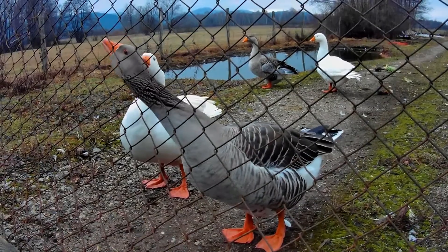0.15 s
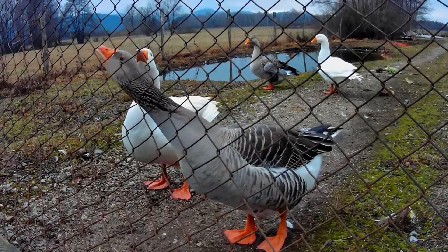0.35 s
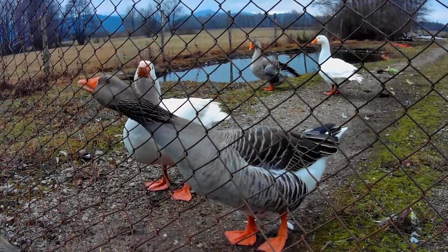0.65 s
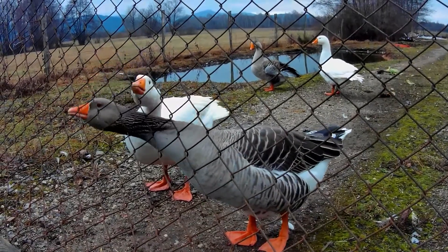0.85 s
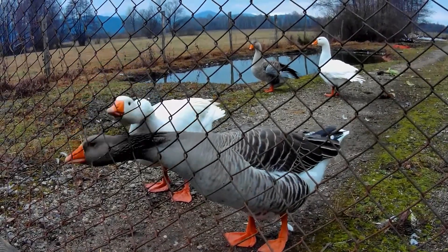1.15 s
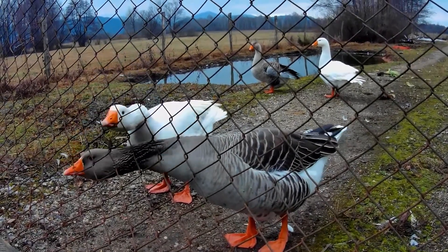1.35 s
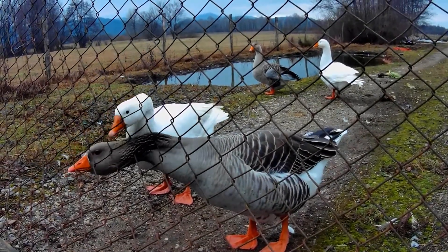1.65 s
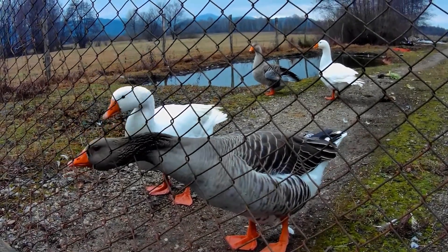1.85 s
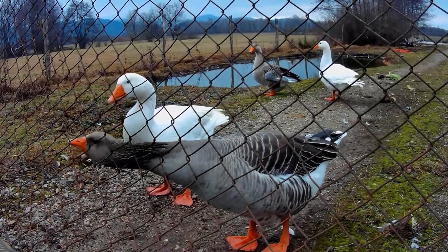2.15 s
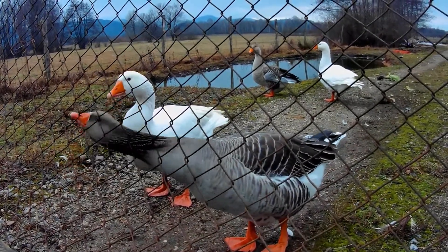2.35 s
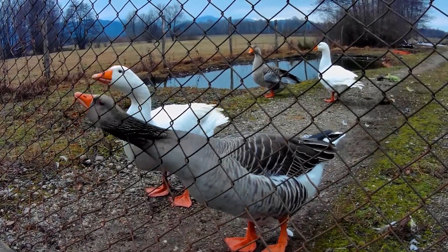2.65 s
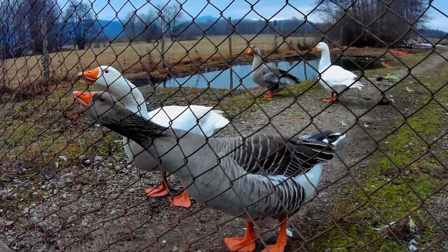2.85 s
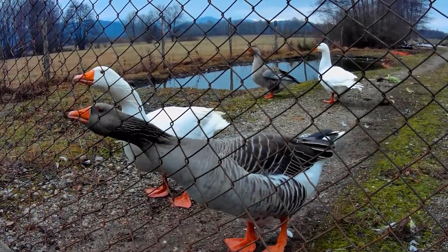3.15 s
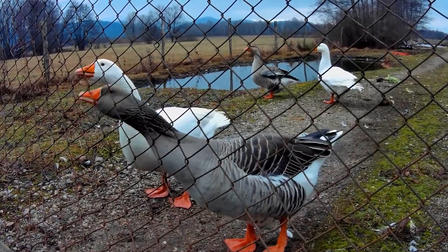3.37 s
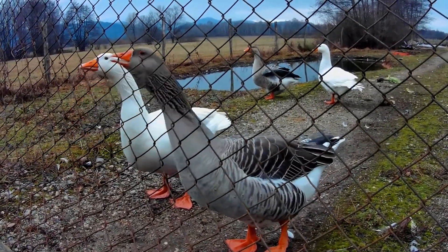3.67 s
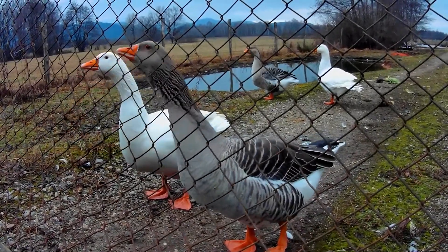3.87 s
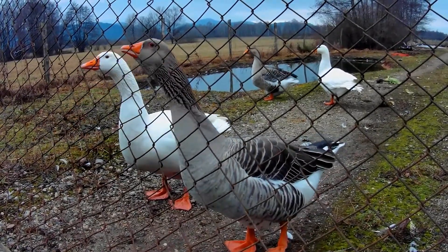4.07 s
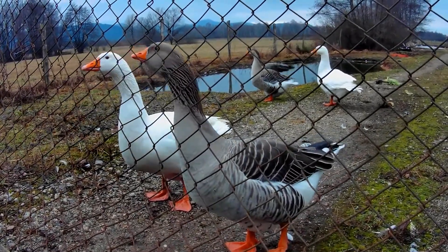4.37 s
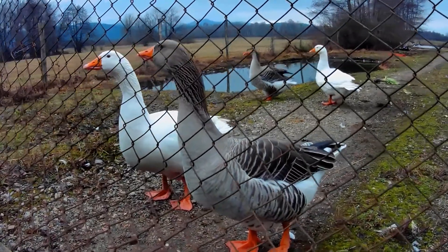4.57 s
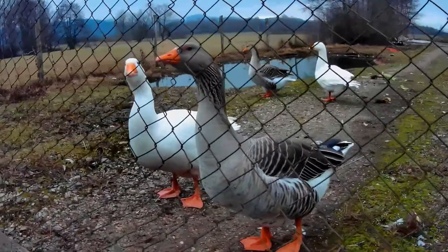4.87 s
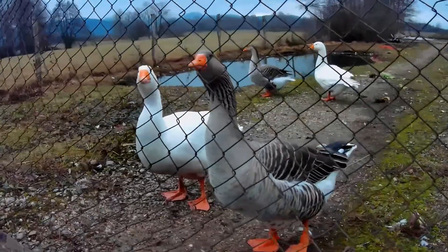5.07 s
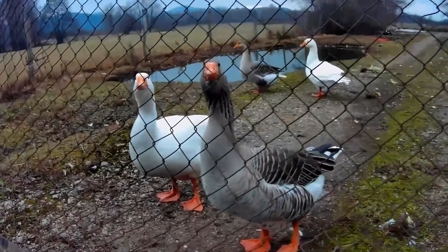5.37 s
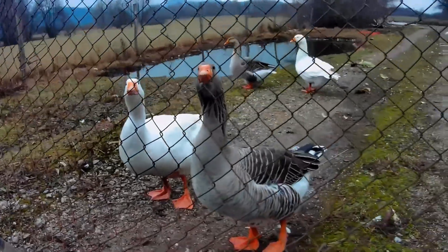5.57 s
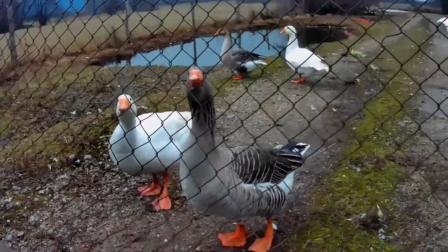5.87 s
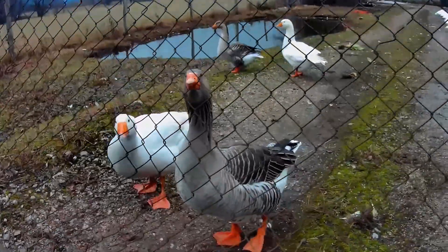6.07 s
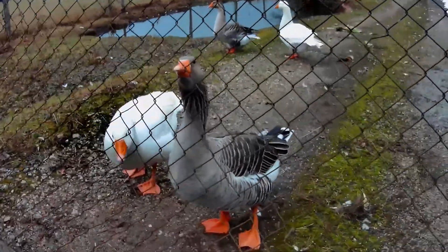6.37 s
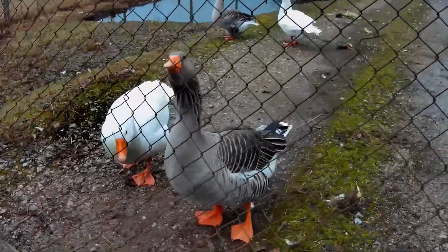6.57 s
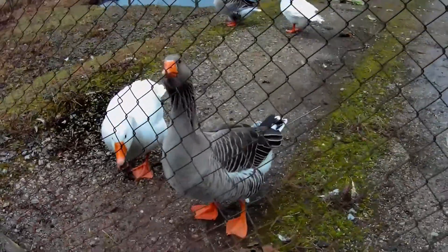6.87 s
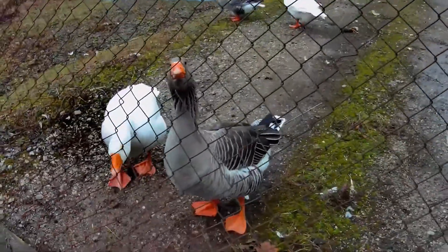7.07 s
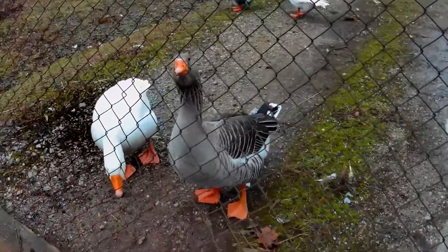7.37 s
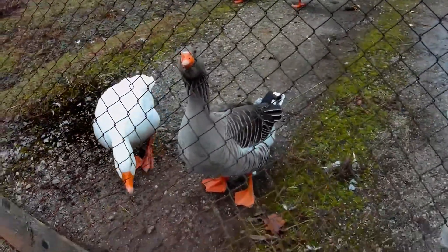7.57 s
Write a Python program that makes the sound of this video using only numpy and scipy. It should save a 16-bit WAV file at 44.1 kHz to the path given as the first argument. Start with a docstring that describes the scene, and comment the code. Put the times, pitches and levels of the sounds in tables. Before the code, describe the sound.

A goose cackles close by in two rough pulsing bouts, gives two loud honks, then settles to soft grunts, gravel ticks and light wind.

```python
"""A domestic goose cackles in two bouts and breaks into two loud honks, at a wire fence by a pond, close by.
Its calls are syrinx pulses ringing a windpipe filter, rebalanced in bands, with short yelps and thin peeps.
A second goose grunts along in low, loose pulses and goes on softly; another answers from far off.
Feet tick on gravel as noise knocks and grains; filtered noise makes light wind and faint open air.
The microphone hears the yard's scatter and a faint tail; a noise gate lets hiss in with the sound."""
import sys
import numpy as np
from scipy import signal
from scipy.fft import rfft
from scipy.io import wavfile
from scipy.ndimage import uniform_filter1d, map_coordinates

SR = 44100
rng = np.random.default_rng(int(sys.argv[2]) if len(sys.argv) > 2 else 0)


def dump_mix(stems):
    """Bounce the given channels to the path in sys.argv[1] as a 16-bit WAV at rate SR."""
    frames = np.atleast_2d(stems).T  # one column per channel
    limited = np.clip(frames, -1, 1)  # hard clip at full scale
    pcm = np.round(limited * 32767).astype(np.int16)
    wavfile.write(sys.argv[1], SR, pcm)


N = 340452
TIME = np.arange(N) / SR  # [s]

# All source levels hold before the yard adds its reflections.
# Syllables of the cackling goose: (start [s], end [s], top pitch [Hz], throat body at the crest [dB],
# nasal ring at the crest [dB], roughness at the crest [0-1], bill opening [factor on the resonances])
CACKLES = [(.123, .235, 157.2, -33.5, -26, 0.33, 0.97), (.228, 0.314, 153, -31.5, -27.5, 0.25, 1),
           (.328, 0.445, 153.4, -34.5, -25.5, 0.2, 0.99), (.405, 0.54, 158.2, -30.5, -22.5, 0.16, 0.99),
           (.525, 0.633, 156.2, -30.5, -24, 0.07, 1), (.615, 0.729, 164.3, -30, -21, 0.2, 0.98),
           (.71, 0.825, 166.9, -28.5, -20.5, .1, 1.007), (.805, 0.923, 170, -29, -22.5, 0.13, 1.025),
           (.915, 1.051, 170.2, -29, -24.5, 0.26, 1.046), (1.082, 1.119, 183.6, -30, -42, 0.56, 1.1),
           (1.105, 1.182, 176.4, -29.5, -25, 0.33, 1.003), (2.467, 2.554, 163.4, -34.5, -37, 0.7, 1.04),
           (2.535, 2.609, 167.3, -34.5, -40.5, 0.54, 0.94), (2.657, 2.762, 165.6, -30, -24.5, 0.27, 1.01),
           (2.745, 2.861, 161.1, -30.5, -27, 0.28, 1.007), (2.852, 2.966, 164, -29, -22.5, .18, 1.01),
           (2.955, 3.105, 163.4, -32, -23, .28, .98), (3.07, 3.173, 165.6, -33.5, -28, .1, 1.033),
           (3.177, 3.252, 183.7, -32.5, -24.5, 0.36, 0.92), (3.225, 3.306, 188.8, -31, -26, 0.31, 0.96),
           (3.326, 3.425, 173, -25, -23.5, 0.42, 1.09), (3.42, 3.499, 183.7, -30.5, -28.5, .35, 0.91),
           (3.465, 3.559, 168.4, -31, -26.5, 0.33, 1.086)]
# Loud honks: (start [s], end [s], pitch before the push [Hz], held level [dB], second push [dB])
HONKS = [(3.643, 3.859, 180.1, -17, 7), (3.894, 4.035, 176.2, -18, -0.5)]
# Parts of a honk, in rows chest, body, nasal ring, rasp:
# (over the held level [dB], share of the push [1], added at the start [dB], added at the end [dB])
HONK_PARTS = [(-21, 0.17, -16, -13.5), (-8, .17, -22.5, -11.5), (0, 0.98, -34.5, -28.5),
              (-12, 0.98, -22, -23.5)]
# Short hoarse yelps: (start [s], end [s], first pitch [Hz], throat body [dB], nasal ring [dB], rasp [dB])
YELPS = [(1.294, 1.351, 180.8, -27, -18, -31), (2.177, 2.247, 170.1, -29.5, -31.5, -46.5),
         (3.869, 3.92, 186.5, -20, -29.5, -28.5), (4.162, 4.213, 177.8, -26.5, -28.5, -43)]
# Thin whistled peeps, alone or as a syllable breaks out:
# (start [s], end [s], first pitch [Hz], last pitch [Hz], level at the crest [dB], octave re first harmonic [dB])
PEEPS = [(0.052, 0.088, 982, 935, -54, 1), (0.114, 0.149, 1107, 1120, -46, 3),
         (1.101, 1.17, 1190, 1275, -33, 14), (2.17, 2.229, 1040, 950, -35, -4.5),
         (2.379, 2.448, 723, 530, -47, -36), (2.458, 2.52, 1094, 1160, -42, 6),
         (2.655, 2.676, 1082, 1110, -40.5, 4)]
# Throat resonances of the cackle and yelp: (frequency [Hz], level [dB])
CACKLE_THROAT = [(200, -33), (330, -29.5), (400, -23), (480, -5.5), (630, -8.5), (790, -0.5), (950, -18),
                 (1120, 3.5), (1230, 3.5), (1430, -27.5), (1700, -14.5), (1830, -17.5), (1980, -7.5),
                 (2180, -15), (2380, -14), (2750, -25.5), (3500, -26.5), (4500, -41.5), (7000, -59),
                 (10000, -73)]
# Throat resonances of the honk: (frequency [Hz], level [dB])
HONK_THROAT = [(200, -33), (370, -37.5), (550, -10.5), (740, -13.5), (920, -26.5), (1100, -3.5),
               (1280, -17.5), (1470, -51.5), (1660, -22), (2000, -34.5), (2380, -12), (2600, -28.5),
               (2880, -22.5), (3200, -43.5), (3650, -42.5), (4050, -38.5), (4700, -53.5), (5250, -48.5),
               (5700, -57.5), (6350, -53.5), (7300, -74), (10000, -80)]
# Bands of throat body, nasal ring and rasp: (low edge [Hz], high edge [Hz])
CALL_BANDS = [(260, 930), (930, 1430), (1430, 12000)]
# Grunts of the second goose:
# (start [s], length [s], level [dB], pitch before its arch [Hz], nasal ring [dB], low edge [Hz])
GRUNTS = [(.048, 0.069, -51.5, 135.6, 10, 102), (0.257, 0.065, -31.5, 141.7, -14, 370),
          (0.483, 0.08, -29, 143.5, 10.5, 366), (0.579, 0.057, -34, 140.7, 0, 400),
          (.67, 0.18, -33, 141, 0, 370), (0.941, 0.096, -28.5, 138, 0, 368), (1.18, .096, -37, 130, 7, 110),
          (1.391, .12, -42, 125.3, 3, 100), (1.62, 0.099, -46, 125.3, 1, 101),
          (2.54, 0.048, -31.5, 134.4, 13, 410), (2.756, 0.13, -33, 141.1, 6.5, 422),
          (2.967, .17, -31, 139.8, -10, 394), (3.224, 0.092, -27, 157.4, 16, 465),
          (3.457, 0.1, -27.5, 142.3, 6.5, 413), (5.879, 0.099, -49.5, 122.4, 6.5, 316),
          (6.149, 0.09, -52.5, 120.6, 17, 398), (6.384, .1, -56, 111.8, 13.5, 337.5),
          (6.632, 0.096, -57, 116, 7, 303), (6.931, 0.1, -47.5, 117.9, 10, 100),
          (7.191, .13, -52, 122.8, 7.5, 99.5), (7.457, 0.15, -51.5, 125.5, 10, 100.6),
          (7.7, 0.066, -61.5, 117, -4.5, 100)]
# Throat resonances of the grunt: (frequency [Hz], level [dB])
GRUNT_THROAT = [(70, -30.5), (130, -1), (260, -4.5), (380, -15), (520, -1.5), (680, 0.5), (880, -8.5),
                (1100, -11), (1600, -17), (2100, -16), (2700, -31), (5000, -41.5), (9000, -65.5)]
# Louder grunts reach higher: (level [dB], top edge [Hz])
GRUNT_TOP = [(-53, 1100), (-51, 2030), (-39.5, 3700)]
# Answers of the far goose: (start [s], end [s], top pitch [Hz], nasal ring at the crest [dB])
FAR_CALLS = [(4.448, 4.646, 186.3, -57.5), (4.69, 4.805, 179, -67), (5.112, 5.198, 179, -69),
             (5.277, 5.463, 186.4, -67.5)]
# Feet on gravel: (time [s], level of the first 10 ms [dB], centre frequency [Hz], 60 dB decay time [s])
TICKS = [(2.002, -68.5, 3200, 0.019), (4.74, -55, 848, 0.057), (4.94, -54, 1220, .035),
         (5.387, -46.5, 536, 0.053), (5.387, -49, 259, 0.11), (5.389, -62, 1300, 0.049),
         (5.691, -73.5, 2970, 0.063), (5.764, -64.5, 2200, .06), (5.932, -55.5, 2000, .04),
         (6.062, -73, 1960, .037), (7.065, -51.5, 700, 0.13), (7.113, -57.5, 534, .091)]
# Gravel shifting under a step: (time of the peak [s], level [dB], rise [dB/s], fade [dB/s])
SCUFFS = [(5.8, -66.5, 130, 110), (5.949, -64.5, 150, 91), (6.96, -65.5, 600, 71)]
# Spectrum of shifting gravel: (frequency [Hz], level [dB])
SCUFF_COLOUR = [(600, -54), (1500, -7), (2100, 5), (3000, -20), (4200, -19), (5500, -15), (8000, -28),
                (14000, -35)]
# Decay of the yard's tail: (frequency [Hz], 60 dB decay time [s])
YARD = [(150, 0.55), (600, 0.48), (1100, 0.24), (2500, 0.45), (6000, 0.95)]
# Wind gusts: (time of the peak [s], half width at 1/e [s], rise over the steady wind [dB])
GUSTS = [(5.7, 0.23, 11), (6.15, 0.32, 12.5), (6.85, 0.057, 4), (7.5, 0.068, 8)]
# Spectrum of the wind rumble: (frequency [Hz], level [dB])
WIND_COLOUR = [(8, -2.5), (20, 7), (40, -3), (80, -5.5), (130, -21), (250, -36.5), (600, -64)]
# Spectrum of the open air: (frequency [Hz], level [dB])
AIR_COLOUR = [(60, -1), (150, -5.5), (300, -9.5), (600, -11), (1100, -7.5), (1600, -19.5), (3000, -31),
              (7000, -41), (12000, -31.5), (15000, -40.5)]
# Spectrum of the gated hiss: (frequency [Hz], level [dB])
HISS_COLOUR = [(2000, -7.5), (7000, -28), (8200, -13), (9300, -2.5), (10800, -9.5), (12000, -21.5),
               (14000, -34)]

CREST = .42  # share of a syllable or yelp that passes before its effort peaks
SCOOP, DROOP = .02, 0.077  # shares by which the pitch is lower at a syllable's start and end
BILL_OPENS, BILL_SHUTS = 0.018, 0.076  # falls of the resonance factor at a syllable's start and end
# The rasp of a middling syllable, which grows as the goose presses higher and rings louder
USUAL_HZ, USUAL_RING_DB = 165, -25
RASP_DB, RASP_DB_PER_HZ, RASP_FOLLOWS_RING = -35.5, 0.4138, 0.76
HONK_ATTACK_S, HONK_RELEASE_SHARE = 0.021, 0.2
BURST_DB, BURST_S = 8.5, .036  # opening push of a honk, and the time in which it falls to 1/e
PUSH_AT_S, PUSH_WIDTH_S = 0.14, .046  # when the second push peaks, and its half width at 1/e
HONK_HZ_PER_DB, HONK_DROOP = 0.8, .18  # pitch rises with the push and sinks by this share at the end
HONK_BILL, HONK_BILL_SAG = 1.039, 0.073  # resonance factor at the start, and its fall over the honk
YELP_DROOP, YELP_BILL = .09, .93  # share by which the pitch falls; resonance factor
WIND_DB, AIR_DB = -57.5, -74  # the steady background
# The background dips briefly between the bouts
LULL_AT_S, LULL_WIDTH_S, WIND_LULL_DB, AIR_LULL_DB = 2.025, 0.29, -19, -11.5
EDGE_HZ = 15300  # upper band limit


def cackles(chest_db=-32.5, chest_below_body_db=5.0):
    """Two bouts of run-together syllables; the higher and louder ones rasp more."""
    out = np.zeros(N)
    for start, end, hz, body_db, ring_db, rough, bill in CACKLES:
        pressed_db = RASP_DB_PER_HZ * (hz - USUAL_HZ)
        rasp_db = RASP_DB + pressed_db + RASP_FOLLOWS_RING * (ring_db - USUAL_RING_DB)
        chest = min(chest_db, body_db - chest_below_body_db)
        add(out, start, syllable(end - start, hz, rough, bill, chest, body_db, ring_db, rasp_db))
    return out


def syllable(length, top_hz, rough, bill, chest_db, body_db, ring_db, rasp_db,
             chest_dip_db=-17, body_dip_db=-14, ring_dip_db=-17, rasp_dip_db=-11, fray=.22):
    """One arch of effort: pitch, level and bill rise to a crest and sink; the edges are rougher."""
    u = np.linspace(0, 1, int(length * SR))
    before = ((CREST - u) / CREST).clip(0) ** 2
    after = ((u - CREST) / (1 - CREST)) ** 2
    edge = np.maximum(before, after)
    pitch = top_hz * (1 - SCOOP * before - DROOP * after)
    opening = bill - BILL_OPENS * before - BILL_SHUTS * after
    return call(CACKLE_THROAT, pitch, rough + fray * edge, opening,
                chest_db + chest_dip_db * edge, body_db + body_dip_db * edge ** 2,
                ring_db + ring_dip_db * edge, rasp_db + rasp_dip_db * edge ** 2)


def honks(clean=.08, fray=0.36, release_bend=0.74):
    """Long, clean calls with a strong nasal ring: burst, hold, a second change of push, rough sinking end."""
    out = np.zeros(N)
    for start, end, hz, db, second_db in HONKS:
        t = np.arange(0, end - start, 1 / SR)
        u = t / (end - start)
        opening = (1 - t / HONK_ATTACK_S).clip(0)
        closing = (1 - (1 - u) / HONK_RELEASE_SHARE).clip(0) ** release_bend
        burst_db = BURST_DB * np.exp(-(t - HONK_ATTACK_S).clip(0) / BURST_S)
        push_db = burst_db + second_db * bump(t, PUSH_AT_S, PUSH_WIDTH_S)
        pitch = (hz + HONK_HZ_PER_DB * push_db) * (1 - HONK_DROOP * u ** 8)
        levels = [db + over_db + share * push_db + start_db * opening + end_db * closing
                  for over_db, share, start_db, end_db in HONK_PARTS]
        rough = clean + fray * (opening + closing)
        add(out, start, call(HONK_THROAT, pitch, rough, HONK_BILL - HONK_BILL_SAG * u, *levels))
    return out


def yelps(rough=0.62, chest_db=-44, dip_db=-19, rasp_dip_db=-13):
    """Brief rough cries with the bill half shut: a sharp peak of effort on a falling pitch."""
    out = np.zeros(N)
    for start, end, hz, body_db, ring_db, rasp_db in YELPS:
        u = np.linspace(0, 1, int((end - start) * SR))
        edge = np.maximum((CREST - u) / CREST, (u - CREST) / (1 - CREST))
        held = np.ones(len(u))
        pitch = hz * (1 - YELP_DROOP * u)
        add(out, start, call(CACKLE_THROAT, pitch, rough * held, YELP_BILL * held,
                             chest_db + dip_db * edge, body_db + dip_db * edge,
                             ring_db + dip_db * edge, rasp_db + rasp_dip_db * edge))
    return out


def call(throat, hz, rough, bill, chest_db, *band_levels_db, shimmer=1.3):
    """Pulses ring the long windpipe; the bill slides its resonances and shifts weight between bands."""
    clock = np.cumsum(bill)  # a faster clock raises every resonance, while the pitch is kept
    even = np.arange(clock[-1] + 2)
    drive = syrinx(np.interp(even, clock, hz / bill), np.interp(even, clock, rough))
    voiced = map_coordinates(colour(drive, throat), [clock])
    fundamental = np.sin(2 * np.pi * np.cumsum(hz) / SR)
    chest = evened(fundamental * (1 + shimmer * rough * wander(len(hz), 110)))
    out = gain_of(chest_db) * chest
    for edges, db in zip(CALL_BANDS, band_levels_db):
        part = band(voiced, *edges)
        power = uniform_filter1d(uniform_filter1d(part ** 2, size=540), size=800)
        out += gain_of(db) * part / np.sqrt(abs(power) + 1e-20)  # each band follows its own level
    return faded(out, size=600)


def syrinx(hz, rough, jitter=.07, shimmer=.7, breath=.65, flutter_db=4, smear=1.1):
    """One pulse a cycle, uneven when rough, with a puff of air each; the upper harmonics flutter and blur."""
    count, k = len(hz), np.arange(1, 56)  # k: harmonic numbers
    turns = np.cumsum(hz * (1 + jitter * rough * wander(count, 170))) / SR
    loose = np.clip((k[:, None] - 6) / 6, .3, 1)  # higher harmonics wander more
    size, shift = np.array([[wander(count, 16) for _ in k] for _ in range(2)]) * loose
    harmonics = gain_of(flutter_db * size) * np.cos(2 * np.pi * np.outer(k, turns) + smear * shift)
    pulses = evened(harmonics.sum(0))
    puffs = evened((.4 + np.exp(-(turns % 1) / .25)) * rng.standard_normal(count))
    return pulses * (1 + shimmer * rough * wander(count, 200)) + breath * rough * puffs


def peeps():
    """Near-pure notes with an octave above; each swells and fades while its pitch glides ever faster."""
    out = np.zeros(N)
    for start, end, first_hz, last_hz, db, octave_db in PEEPS:
        u = np.linspace(0, 1, int((end - start) * SR))
        angle = 2 * np.pi * np.cumsum(first_hz + (last_hz - first_hz) * u ** 2) / SR
        note = evened(np.sin(angle) + gain_of(octave_db) * np.sin(2 * angle))
        add(out, start, gain_of(db) * np.sin(np.pi * u) ** 2 * note)
    return out


def grunts(arch=.13, rise=.05, rough=.7, scatter_db=-4):
    """Low, loose pulses through a nearly shut bill, blurred by the ground; pitch and level arch."""
    out = np.zeros(N)
    for start, length, db, hz, ring_db, low_hz in GRUNTS:
        swell = np.sin(np.pi * np.linspace(0, 1, int(length * SR)) ** .8).clip(0)
        pitch = hz * (1 + arch * (swell - .7) + rise * np.linspace(-1, 1, len(swell)))
        drive = syrinx(pitch, rough)
        voiced = colour(np.pad(drive * swell ** .8, (0, 3000)), GRUNT_THROAT)  # room to ring out
        ground = rng.standard_normal(2000) * np.exp(-TIME[:2000] / .01)
        scatter = signal.oaconvolve(voiced, ground / np.linalg.norm(ground))[:len(voiced)]
        voiced += gain_of(scatter_db) * scatter
        ringing = colour(voiced, [(800, 0), (1080, ring_db), (1400, 0.00066)])
        voiced = band(ringing, low_hz, along(GRUNT_TOP, db)[0], order=7)
        add(out, start, gain_of(db) * voiced / voiced[:len(swell)].std())
    return out


def far_goose(rough=0.679, chest_db=-35, body_db=-18, rasp_db=-22):
    """From far off little but the nasal ring carries; the other parts are set relative to it."""
    out = np.zeros(N)
    for start, end, hz, db in FAR_CALLS:
        far_call = syllable(end - start, hz, rough, 0.97, db + chest_db, db + body_db, db, db + rasp_db)
        add(out, start, far_call)
    return out


def gravel(spread=1.34, grain_db=4):
    """Short dull knocks of webbed feet, and small stones shifting under them as sparse filtered clicks."""
    out, t = np.zeros(N), TIME[:SR // 8]
    for start, db, hz, t60 in TICKS:
        decaying = rng.standard_normal(len(t)) * gain_of(-60 * t / t60)
        knock = band(decaying, hz / spread, hz * spread, order=3)
        add(out, start, gain_of(db) * knock / np.sqrt(np.mean(knock[:SR // 100] ** 2)))
    struck = rng.random(N) < 2600 / SR  # about 2600 grains a second
    grains = rng.standard_normal(N) * struck * gain_of(grain_db * rng.exponential(1, N).clip(0, 4))
    shifting = sum(gain_of(db - np.maximum(rise * (peak - TIME), fade * (TIME - peak)))
                   for peak, db, rise, fade in SCUFFS)
    return out + shifting * evened(colour(grains, SCUFF_COLOUR))


def yard(x, tail_db=-22, near_db=-15, apart=.45):
    """Fence and ground scatter a little at once, differently to each ear; a faint tail follows."""
    taps = rng.standard_normal((2, SR)) * (rng.random((2, SR)) < 2500 / SR)  # sparse reflections
    early = taps[0] * np.exp(-TIME[:SR] / .02)
    side = gain_of(near_db) * signal.oaconvolve(x, early / np.linalg.norm(early))[:N]
    hz, t, z = signal.stft(taps * (TIME[:SR] > .012), SR, nperseg=256)
    decay = gain_of(-60 * t / read(YARD, hz)[:, None])
    tail = signal.istft(z * decay, SR, nperseg=256)[1]
    tail /= np.sqrt(np.mean(abs(rfft(tail[0], SR)[500:2500]) ** 2))  # unit gain over 500-2500 Hz
    mid, wide = gain_of(tail_db) * signal.fftconvolve(x[None], tail, axes=1)[:, :N]
    return x + mid + (side + apart * wide) * np.array([[1], [-1]])


def outdoors(gust_db=2.5, apart=.09):
    """Lumpy wind rumble with a few gusts, and faint open air, nearly alike at both ears."""
    lull = bump(TIME, LULL_AT_S, LULL_WIDTH_S)
    gusts_db = sum(db * bump(TIME, peak, width) for peak, width, db in GUSTS)
    wind_db = WIND_DB + WIND_LULL_DB * lull + gusts_db

    def layer():
        """One independent draw of shaped wind and air noise."""
        rumble = colour(rng.standard_normal(N), WIND_COLOUR, size=16384)
        wind = evened(rumble * gain_of(gust_db * wander(N, 14)))
        air = evened(colour(rng.standard_normal(N), AIR_COLOUR))
        return gain_of(wind_db) * wind + gain_of(AIR_DB + AIR_LULL_DB * lull) * air
    return layer() + apart * layer() * np.array([[1], [-1]])


def gain_of(db):
    """Decibels to gain."""
    return 10 ** (np.asarray(db) / 20)


def evened(x):
    """Scales to rms 1."""
    return x / np.sqrt(np.mean(x ** 2) + 1e-20)


def read(points, hz):
    """Reads a spectrum on a log-frequency axis."""
    f, value = np.transpose(points)
    return np.interp(np.log(hz + 1), np.log(f + 1), value)


def along(rows, at):
    """The columns of a curve, read at values of its first column."""
    first, *columns = np.transpose(rows)
    return [np.interp(at, first, column) for column in columns]


def add(mix, start, sound):
    """Mixes a sound in at a start time in seconds."""
    part = mix[max(round(start * SR), 0):][:len(sound)]
    part += sound[:len(part)]


def colour(x, points, size=4096):
    """A causal, minimum-phase filter with the given spectrum: it rings after each pulse."""
    level_db = np.maximum(read(points, abs(np.fft.fftfreq(size, 1 / SR))), -100)
    log_gain = np.log(gain_of(level_db))
    taps = np.fft.ifft(np.exp(np.conj(signal.hilbert(log_gain)))).real[:size // 2]
    return signal.oaconvolve(x, taps)[:len(x)]


def band(x, lo_hz, hi_hz, order=4):
    """Band-pass."""
    edges = [lo_hz, min(hi_hz, SR / 2 - 100)]
    return signal.sosfilt(signal.butter(order, edges, "band", fs=SR, output="sos"), x)


def wander(count, hz):
    """Random drift of rms 1, in straight runs between hz fresh values a second."""
    knots = rng.standard_normal(int(count * hz / SR) + 3)
    return evened(np.interp(np.arange(count) * hz / SR, np.arange(len(knots)), knots))


def faded(x, size=260):
    """Softens both ends, over size samples in all."""
    return x * signal.windows.tukey(len(x), min(size / len(x), 1))


def bump(t, at, width):
    """A bell of height 1."""
    return np.exp(-((t - at) / width) ** 2)


def scene():
    """The geese and gravel sound just left of centre in the yard; wind and air lie around them."""
    sources = cackles() + honks() + yelps() + peeps() + grunts() + far_goose() + gravel()
    return yard(sources) * gain_of([[.2], [-.2]]) + outdoors()


def record(dry, open_db=-38, hiss_db=-61, depth_db=33, slope=1.4, release_db=110, lag=.025):
    """A noise gate opens with the sound and shuts slowly, letting treble hiss through; then the band limit."""
    power = uniform_filter1d(band(dry.mean(0), 200, 5000) ** 2, size=600)
    power_db = 10 * np.log10(abs(power) + 1e-12)
    fall = TIME * release_db  # release in dB per second
    held_db = np.maximum.accumulate(np.minimum(power_db - open_db, 0) + fall) - fall
    keep = np.exp(-1 / (lag * SR))  # smoothing with a lag in seconds
    lift_db = np.maximum(slope * held_db + depth_db, 0)
    gate_db = signal.lfilter([1 - keep], [1, -keep], lift_db) - depth_db
    mid, side = [evened(colour(noise, HISS_COLOUR)) for noise in rng.standard_normal((2, N))]
    hiss = gain_of(hiss_db + gate_db) * (mid + .11 * side * np.array([[1], [-1]]))
    low_pass = signal.firwin(511, EDGE_HZ, window=("kaiser", 9), fs=SR)
    return signal.oaconvolve(dry + hiss, low_pass[None], "same")


dry = scene()
out = record(dry)
dump_mix(out)
```